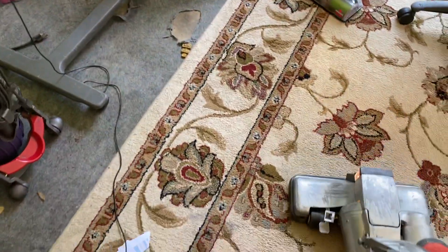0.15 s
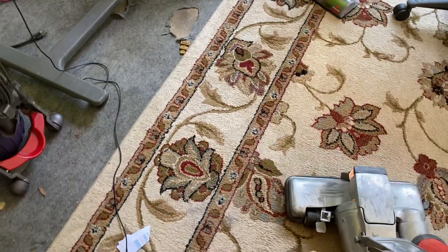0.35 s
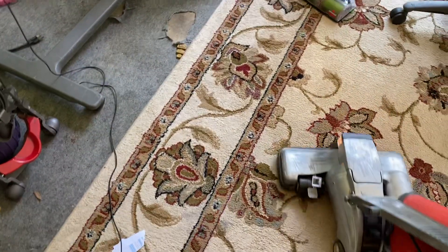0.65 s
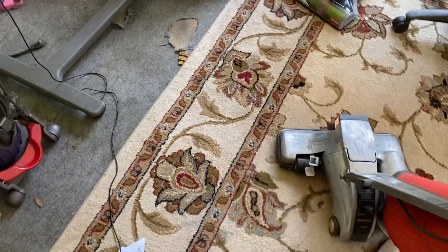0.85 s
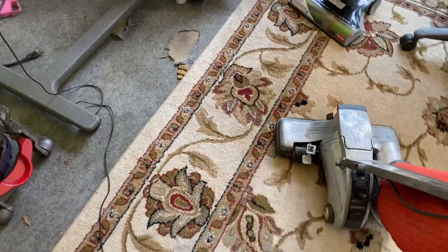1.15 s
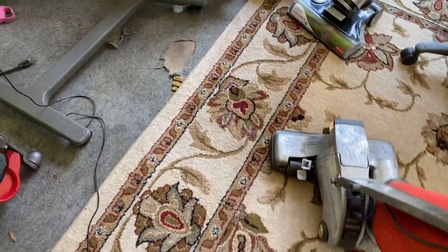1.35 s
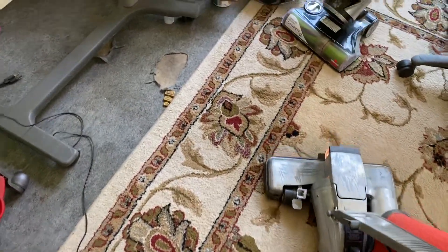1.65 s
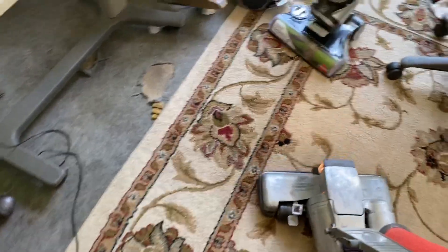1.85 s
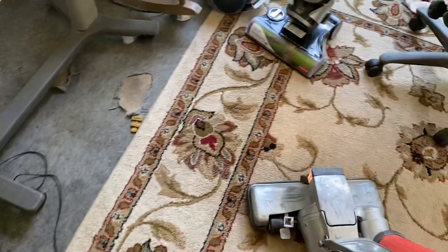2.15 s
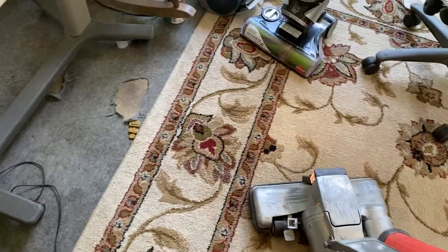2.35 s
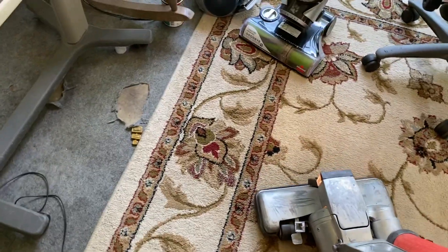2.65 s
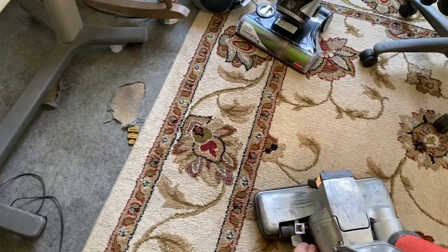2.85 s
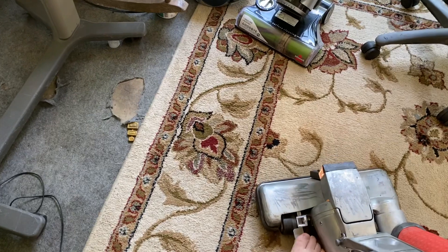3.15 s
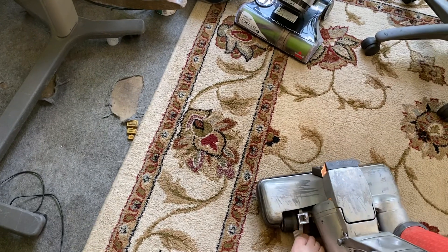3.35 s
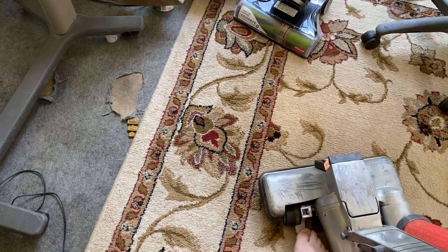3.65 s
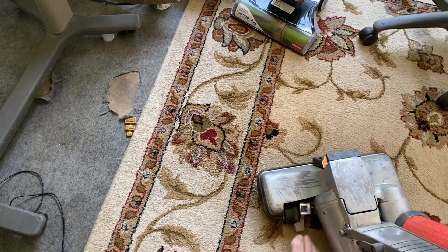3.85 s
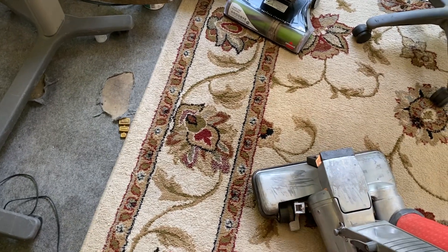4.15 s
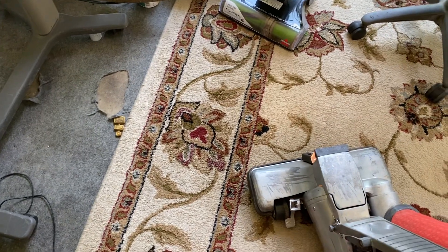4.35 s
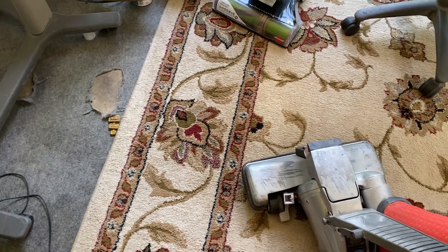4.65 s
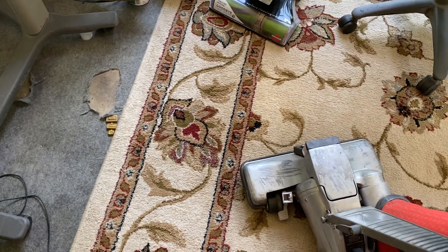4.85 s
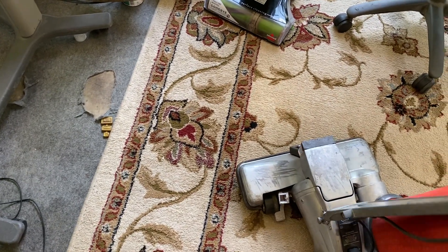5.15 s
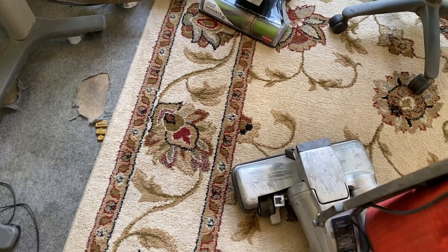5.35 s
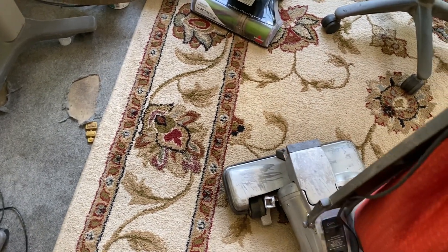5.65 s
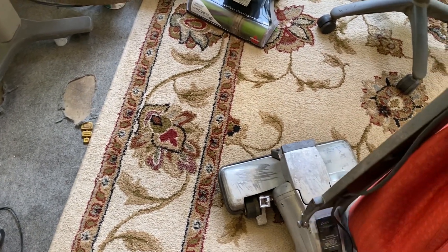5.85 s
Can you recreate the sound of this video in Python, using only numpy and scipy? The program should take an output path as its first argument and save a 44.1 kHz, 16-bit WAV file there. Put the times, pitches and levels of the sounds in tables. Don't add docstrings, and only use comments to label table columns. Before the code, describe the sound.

From 0 s an upright vacuum cleaner roars close by on a rug in a small room: broadband rushing air, a low brush hum near 120 Hz and steady motor tones, including a whir around 1.2 kHz. In the first 0.8 s the head shifts, so hum and airflow swell and dip; then it settles into a steady drone. From 3.28 to 3.53 s five loud, sharp plastic clicks come in a rapid, uneven ratchet, four close together and the last slightly apart, their ring dropping in pitch. The brush hum weakens and the air roar smooths. At 4.48 s a much quieter switch click cuts power. Motor buzz vanishes almost at once, the brush stops by 4.7 s, and the air sinks steadily. A coasting whine slides down, flaring at certain pitches, growing lower and softer until 6 s, with a barely audible tick at 5.9 s.

```python
import sys
import numpy as np
from scipy import signal
from scipy.fft import rfft, irfft, next_fast_len
from scipy.io import wavfile
from scipy.ndimage import uniform_filter1d

SR = 44100
rng = np.random.default_rng(int(sys.argv[2]) if len(sys.argv) > 2 else 0)


def pcm_store(signal):
    levels = np.round(np.clip(np.atleast_2d(signal), -1, 1) * 32767)
    wavfile.write(sys.argv[1], SR, levels.astype(np.int16).T)


def field_ratio(decibels):
    return 10 ** (np.asarray(decibels, dtype=float) / 20)


N = 264644
T = np.arange(N) / SR
SWITCH_OFF_S = 4.48


# f/Hz, level/dB
RUMBLE = [(20, -30), (32, -27), (45, -37), (60, -1), (100, 5), (160, 5.5), (260, 3.5), (500, -52)]
ROAR = [(100, -27), (170, -18), (300, -5.5), (450, -7.5), (560, -5.5), (700, -16), (1000, -63), (2000, -68)]
RUSH = [(350, -48), (550, 5.5), (700, -1), (850, -1.5), (1100, -3), (1300, -14), (1450, -15), (2500, -85)]
HISS = [(900, -26), (1500, 4), (1900, 2.5), (2500, -0.5), (3200, -4), (3900, -10.5), (4500, -8.5),
        (5500, -13.5), (8000, -17.5), (10500, -16.5), (13000, -21), (14300, -27.5), (15700, -26),
        (16100, -60)]
# f/Hz, width/Hz, level/dB
PIPE_MODES = [(237, 59, 5.5), (390.6, 72, 11), (493.4, 40, 8), (750, 26, 2.5), (947, 48, 4), (1276, 39, 12),
              (1753, 17, 1.5), (2300, 42, -3.5), (2580, 66, 0)]
# f/Hz, level/dB
COASTING_TILT = [(1000, 0.5), (1700, -6), (2300, -3.5), (3000, -3), (4000, 2.5), (5500, 2), (9000, 5),
                 (14000, 3)]


def air(patchy_db=1.0):
    frames, hz = N // 512 + 5, np.fft.rfftfreq(2048, 1 / SR)
    t = np.arange(frames) * 512 / SR
    a, b, c, d, patches = rng.standard_normal((frames, 1025, 5)).T
    patches = uniform_filter1d(patches, 20, 0)
    patches = evened(uniform_filter1d(patches, 8, 1))
    power = 0
    for shape, level_db, layer in zip((RUMBLE, ROAR, RUSH, HISS), flow_db(t), LAYERS):
        gusts_db = layer[-1] * np.interp(t, T, waver(30))
        level_db = np.maximum(level_db, -52) + gusts_db
        gain = field_ratio(read_spectrum(shape, hz)) * peaks(PIPE_MODES, hz)
        power = power + np.outer(gain ** 2 / np.sum(gain ** 2), field_ratio(level_db) ** 2)
    depth_db = patchy_db + 3.5 * np.clip((hz[:, None] - 12500) / 1500, 0, 1)
    tilt_db = np.outer(read_spectrum(COASTING_TILT, hz), halvings(t))
    size = np.sqrt(power) * field_ratio(depth_db * patches + tilt_db)
    noise = np.array([a + 1j * b, c + 1j * d]) * size
    return 1.192 * signal.istft(noise, nperseg=2048, noverlap=1536)[1][:, :N]


# level at full speed/dB, share of the nozzle air,
# change once raised/dB, change per halving of speed/dB, gusts/dB
LAYERS = [
    (-32, 0.14, -2, -7, 2.5),
    (-25, 0.78, 3, -15, 1),
    (-28.5, 1, 2, -16.5, 0.6),
    (-32.5, 0.24, -3, -7, 0.5),
]


def flow_db(t):
    nozzle_db = curves(HEAD, t)[2]
    return [db + share * nozzle_db + raised_db * raised(t) + fade_db * halvings(t)
            for db, share, raised_db, fade_db, _ in LAYERS]


def raised(t):
    start_s, end_s = 3.29, 3.55
    return np.clip((t - start_s) / (end_s - start_s), 0, 1)


# t/s, f/Hz, level of the six-blade fan tone/dB
SHAFT = [(0, 194.9, -35), (.17, 194.8, -30), (.45, 197.6, -28), (.53, 197.6, -31.5), (.6, 196.2, -50),
         (.8, 194.8, -31.5), (.98, 195.2, -27.5), (1.25, 195.2, -38), (1.66, 194.5, -35),
         (1.77, 194.8, -29.5), (2.1, 195.3, -30), (2.51, 194.5, -27.5), (2.95, 194.0, -35),
         (3.12, 193.9, -36.5), (3.46, 197.0, -47), (3.7, 198.0, -43), (3.95, 198.7, -34),
         (4.48, 198.9, -34)]


def shaft_hz(t):
    drag, easing = .945, .045
    coasted = np.maximum(t - SWITCH_OFF_S, 0)
    return curves(SHAFT, t)[0] * np.exp(-drag * coasted + easing * coasted ** 2)


def halvings(t):
    return np.log2(np.maximum(SHAFT[0][1] / shaft_hz(t), 1))


# multiple of shaft speed, level at full speed/dB
MOTOR_TONES = [(5, -46.5), (11, -42.5), (12, -54), (14, -48), (15, -57), (16, -56), (17, -62), (20, -53),
               (22, -50), (23, -53), (24, -61.5), (31, -64.5), (33, -84), (34, -90), (39, -55), (40, -55),
               (44, -89), (48, -72), (53, -88), (54, -59), (55, -61), (57, -81), (60, -61)]


def motor(wobble=0.0006):
    speed = shaft_hz(T)
    turns = np.cumsum(speed * (1 + wobble * waver(24.94))) / SR
    powered, fan_fade, armature_fade = [np.clip(1 - (T - SWITCH_OFF_S) / s, 0, 1) for s in (.06, .12, .17)]
    blade_db = curves(SHAFT, T)[1] + 1.5 * waver(30)
    out = fan_fade * field_ratio(blade_db) * np.sin(2 * np.pi * 6 * turns)
    housing_db = -25 + 0.68 * curves(HEAD, T)[2]
    out += powered * field_ratio(housing_db - 2 + 1.2 * waver(40)) * np.sin(2 * np.pi * 2 * turns)
    near_db = flow_db(T)[3] + 32
    for order, db in MOTOR_TONES:
        raised_db = 4 * raised(T) * (order == 22)
        level = powered * field_ratio(db + near_db + raised_db + 2.2 * waver(40))
        out += level * np.sin(2 * np.pi * (order * turns + rng.random()))
    out += armature_fade * field_ratio(near_db) * armature(turns)
    return np.sqrt(2) * (out + coasting_whine(speed, turns))


def armature(turns, comb_db=-63.5):
    angle = np.linspace(0, 1, 8193)
    orders = np.arange(18, 72)
    out = 0
    for part in np.split(rng.permutation(orders), 3):
        heights = field_ratio(comb_db + 2.5 * rng.standard_normal(len(part)) - 2.0 * np.log2(part / 40))
        phases = np.outer(part, angle) + rng.random((len(part), 1))
        pattern = heights @ np.sin(2 * np.pi * phases)
        out = out + field_ratio(3.0 * waver(4)) * np.interp(turns % 1, angle, pattern)
    return out


# multiple of shaft speed, level between natural notes/dB, change per halving of speed/dB
GLIDES = [(6, -57, 0), (11, -69, 0), (17, -80, 0), (22, -70, -3), (33, -77, -2)]
# f/Hz, width/Hz, level/dB
SHROUD = [(465, 75, 20), (545, 60, 11), (720, 40, 18), (832, 50, 21), (1060, 140, 24)]
FRAME = [(935, 80, 27), (1020, 50, 22), (1740, 90, 18), (2030, 120, 17), (2435, 150, 24), (2940, 150, 25),
         (3290, 220, 26)]
HOUSING = [(1720, 170, 8), (2540, 330, 15.5), (2970, 750, 17.5), (3700, 640, 11.5)]


def coasting_whine(speed, turns):
    late = T >= SWITCH_OFF_S
    coasted, slowing = T[late] - SWITCH_OFF_S, halvings(T[late])
    speed, turns = speed[late], turns[late]
    out = np.zeros(N)
    for (order, db, fade_db), modes in zip(GLIDES, [SHROUD] + [FRAME] * len(GLIDES)):
        level = field_ratio(db + fade_db * slowing + 2.0 * waver(30)[late])
        out[late] += level * peaks(modes, order * speed) * np.sin(2 * np.pi * order * turns)
    rise_s = .27
    whine_db = -53.5 - 4.5 * slowing - 11 * np.clip(1 - coasted / rise_s, 0, 1)
    for order in range(13, 67):
        favour_db = 3 if order % 11 == 0 else 0
        chance_db = 2.2 * rng.standard_normal() + 4.0 * waver(30)[late]
        level = field_ratio(whine_db + favour_db - 20 + chance_db) * peaks(HOUSING, order * speed)
        out[late] += level * np.sin(2 * np.pi * (order * turns + rng.random()))
    return out * np.clip((T - SWITCH_OFF_S) / 0.046, 0, 1)


# t/s, lift off the pile from -1 to 1, level of the bristle beat/dB,
# level of the air let in under the nozzle/dB
HEAD = [(0, .5, -24.5, 3), (.08, 0.28, -21, 4), (.15, 0.35, -36, 7), (.42, 0.75, -43, 6.5),
        (.48, 0.46, -21.5, 3.5), (.6, -0.066, -19, -2.5), (.68, -0.65, -23.5, -2), (.82, -0.051, -27, 0.5),
        (1.0, 0.075, -30, -0.5), (1.3, 0, -22, -0.5), (1.9, 0.0099, -28, 1), (2.3, 0.038, -27, 3.5),
        (2.95, -0.026, -26.5, 2), (3.1, 0, -28, 4.5), (3.35, 0.49, -38.5, 6), (3.55, .8, -39.5, -2),
        (4.0, 1, -39.5, 0), (4.69, 1, -44.5, 1)]
# multiple, level/dB
BRUSH_OVERTONES = [(2, -9), (3, -21.5), (4, -24.5)]


def brush():
    lift, level_db, _ = curves(HEAD, T)
    beats_hz = 120.2 + 5.3 * lift
    turns = np.cumsum(beats_hz) / SR
    gain = field_ratio(level_db) * np.clip((HEAD[-1][0] - T) / 0.17, 0, 1)
    hum = np.cos(2 * np.pi * turns)
    over = sum(field_ratio(db + 0.92 * waver(14)) * np.cos(2 * np.pi * k * turns) for k, db in BRUSH_OVERTONES)
    throb = 1 + np.clip(0.95 * gain, 0, .8) * hum
    return np.sqrt(2) * gain * (hum + over), throb


# f/Hz, level/dB, time to fall 60 dB/s
PEDAL = [(1080, 0, .025), (1300, -2, .02), (1780, -4, .015), (3000, -4, .012), (3400, -6, .012),
         (4000, -10, .01), (4700, -5, .014), (5300, -9, .011), (6270, -10, .016), (8300, -6, .014),
         (9400, -7, .012), (10900, -9, .011), (12500, -8, .011)]


def click(db, hz, knock_db, treble_db):
    t = np.arange(1800) / SR
    noise = rng.standard_normal((3, len(t)))
    fade = field_ratio(-60 * t / 0.022)
    scrape = noise[0] * np.clip(t / 0.00015, 0, 1) * fade
    edges = signal.butter(1, [1200 / (SR / 2), 4500 / (SR / 2)], "band")
    crack = field_ratio(treble_db + 1) * evened(signal.lfilter(*edges, scrape)) * 0.099
    body = sum(fade * np.sin(2 * np.pi * hz * near * t) for near in (.94, 1.03))
    bounce = round(6 * SR / hz)
    body = .5 * body + .55 * np.pad(body, (bounce, 0))[:len(t)]
    knock, ring = np.zeros((2, len(t)))
    for (f, mode_db, t60), chance in zip(PEDAL, np.clip(noise[1], -1, 1)):
        level = field_ratio(mode_db + 2 * chance - 60 * t / t60)
        mode = level * np.sin(2 * np.pi * f * (1 + .012 * chance) * t)
        if f < 1600:
            knock += field_ratio(knock_db) * mode
        else:
            ring += mode
    slips = scrape * (abs(noise[2]) > 1.9)
    slips[4] = 1.52
    ring = np.convolve(ring, slips)[:len(t)]
    ring = field_ratio(treble_db + 4.5) * ring / abs(ring).max()
    sound = body + ring + crack + 0.48 * np.pad(knock, (130, 0))[:len(t)]
    sound = sound * np.clip(t / .0008, .6, 1)
    return field_ratio(db) * sound / abs(sound).max()


# t/s, peak level/dB, ring f/Hz, low knock level/dB, treble level/dB
CLICKS = [
    (3.275, -2, 2580, -0.5, 1),
    (3.3143, 0, 2470, 6, 2),
    (3.3523, -2, 2410, -10, -3.5),
    (3.4103, -2, 2255, 0, 2),
    (3.5266, -3, 2067, -2, -1.5),
    (4.4832, -20, 2010, -7, -4),
    (5.916, -39, 3135, 0.5, 5),
]


def all_clicks():
    clicks = np.zeros(N)
    for s, *row in CLICKS:
        add(clicks, s, click(*row))
    return clicks


# f/Hz, time to fall 60 dB/s
ROOM = [(300, 0.41), (1500, 0.18), (6000, 0.19), (14000, 0.04)]


def room(x):
    taps = np.zeros((2, SR // 2))
    at = np.arange(260, SR // 2 - 20, 20)
    at = at + rng.integers(0, 20, (2, len(at)))
    np.put_along_axis(taps, at, rng.choice([-1., 1.], at.shape), 1)
    hz, t, z = signal.stft(taps, SR, nperseg=256)
    fade = field_ratio(-60 * t / read_spectrum(ROOM, hz)[:, None])
    tail = signal.istft(z * fade, SR, nperseg=256)[1]
    return signal.fftconvolve(x[None], tail / np.linalg.norm(tail[0]), axes=1)[:, :N]


# f/Hz, likeness from 0 to 1
LIKENESS = [(60, 0.9), (200, 0.95), (700, 0.82), (1300, 0.56), (2200, 0.82), (3500, 0.51), (4300, 0.22),
            (5500, 0.036), (6600, 1), (7200, 1), (16000, 0.78)]
# f/Hz, level/dB
BALANCE = [(60, 0.5), (200, -2), (400, -3.5), (700, -6.5), (1300, -3), (2200, 2), (3300, 4), (4300, 1.5),
           (5400, 1.5), (6500, 0.5), (16000, 0.5)]
# f/Hz, phase/rad
PORT_LEAD = [(60, 0.076), (300, 0.37), (550, 0.38), (800, 0.63), (1100, -0.078), (1400, 1), (2000, 0.28),
             (3000, 0.49), (4300, 0.73), (5200, 1), (6300, -1.4), (6900, 0.084)]
# f/Hz, level/dB
EDGE = [(20, -10), (40, 0), (15750, 0), (15900, -13), (17000, -20)]


def ports(near, other):
    size = next_fast_len(N + 2048)
    hz = np.fft.rfftfreq(size, 1 / SR)
    same = np.clip(read_spectrum(LIKENESS, hz), 0, 1)
    tilt = field_ratio(read_spectrum(BALANCE, hz) / 2)
    start_hz, cycle_hz = 6925, 4170
    turn = read_spectrum(PORT_LEAD, hz) + 2 * np.pi * np.maximum(hz - start_hz, 0) / cycle_hz
    left = rfft(near, size)
    right = (same * left + np.sqrt(1 - same ** 2) * rfft(other, size)) * np.exp(1j * turn)
    both = np.array([left * tilt, right / tilt]) * field_ratio(read_spectrum(EDGE, hz))
    return irfft(both, size)[:, :N]


def evened(x):
    return x / np.sqrt(np.mean(x ** 2) + 1e-20)


def read_spectrum(points, hz):
    f, value = np.transpose(points)
    return np.interp(np.log(hz + 1), np.log(f + 1), value)


def curves(rows, t):
    s, *columns = np.transpose(rows)
    return [np.interp(t, s, c) for c in columns]


def peaks(modes, hz):
    bells = sum(field_ratio(db) ** 2 / (1 + (2 * (hz - f) / width) ** 2) ** 2 for f, width, db in modes)
    return np.sqrt(1 + bells)


def waver(rate_hz):
    slow_t = T[::64]
    drift = 0
    for f in np.geomspace(rate_hz / 20, rate_hz, 16):
        drift = drift + np.sin(2 * np.pi * (f * slow_t + rng.random())) / np.sqrt(f)
    return evened(drift).repeat(64)[:N]


def add(mix, s, sound):
    part = mix[round(s * SR):][:len(sound)]
    part += sound[:len(part)]


def scene():
    clicks = all_clicks()
    hum, throb = brush()
    solid = motor() + hum + clicks
    flow = air() * throb + field_ratio(-15.0) * room(clicks)
    return ports(solid + flow[0], 0.63 * solid + flow[1])


def top_cut(x):
    return signal.sosfilt(signal.butter(12, 16530, fs=SR, output="sos"), x)


def record(dry):
    limited = 0.94 * np.tanh(dry / .95)
    return top_cut(limited)


dry = scene()
out = record(dry)
pcm_store(out)
```